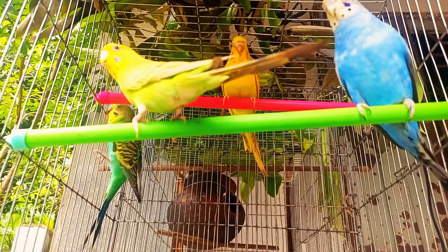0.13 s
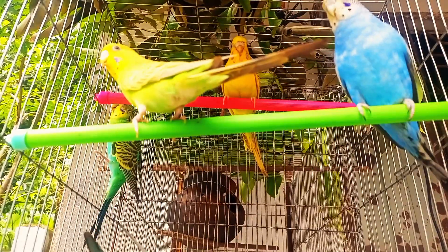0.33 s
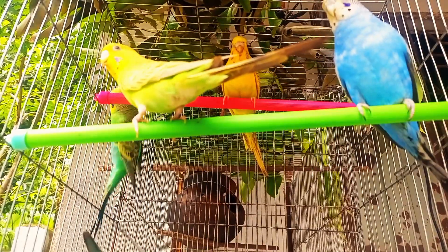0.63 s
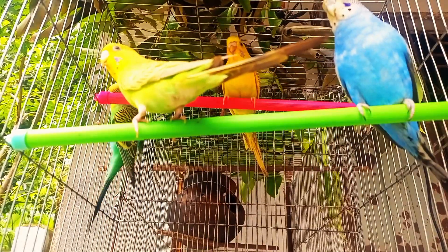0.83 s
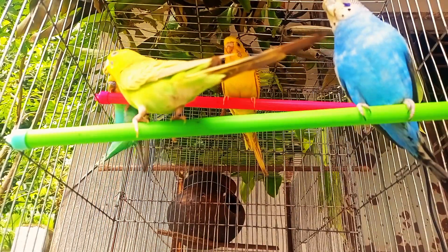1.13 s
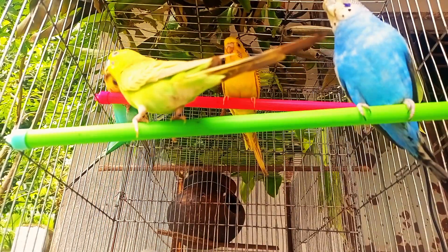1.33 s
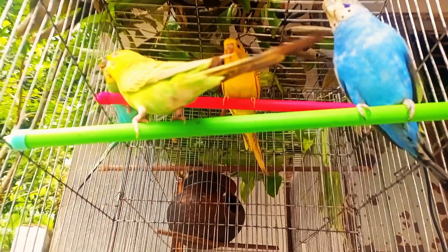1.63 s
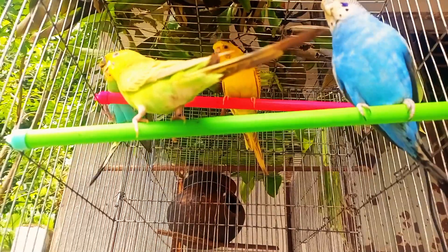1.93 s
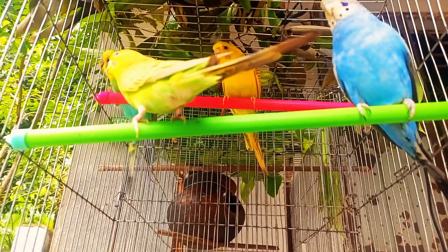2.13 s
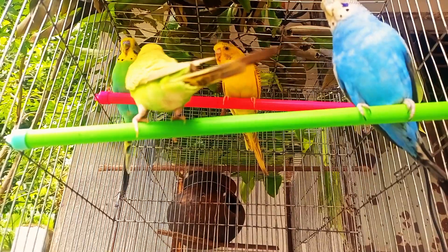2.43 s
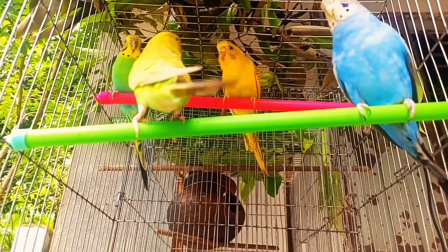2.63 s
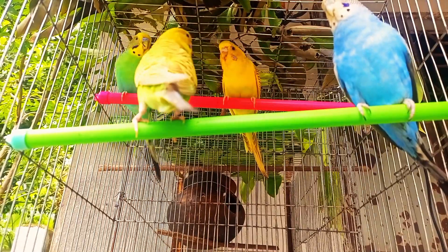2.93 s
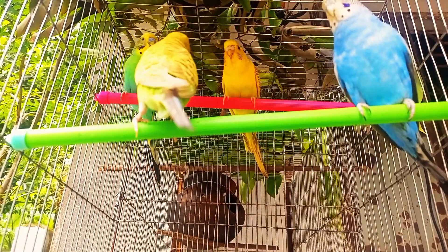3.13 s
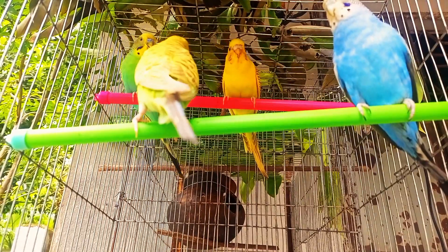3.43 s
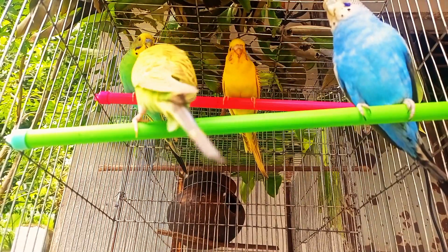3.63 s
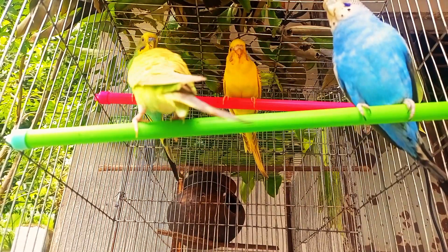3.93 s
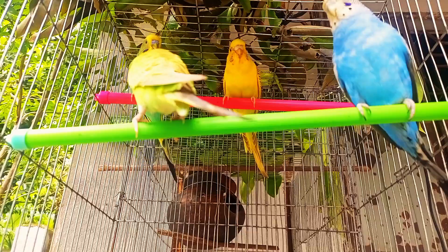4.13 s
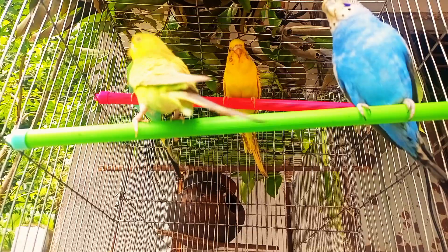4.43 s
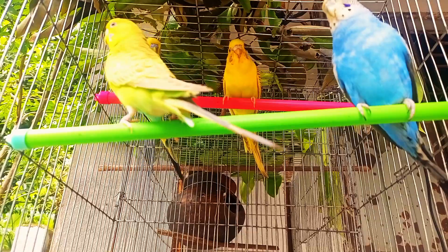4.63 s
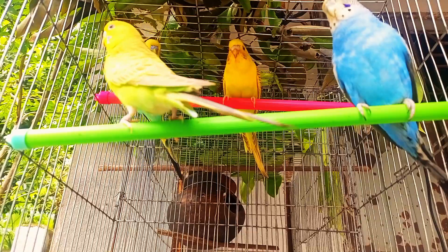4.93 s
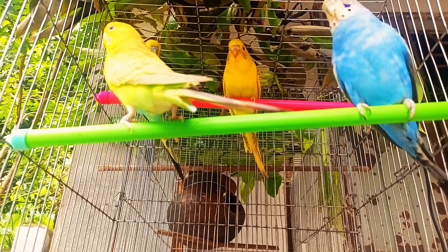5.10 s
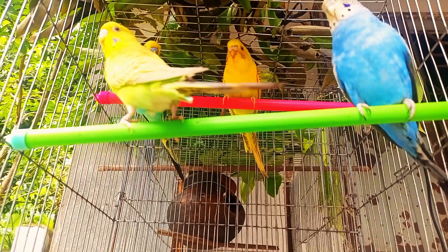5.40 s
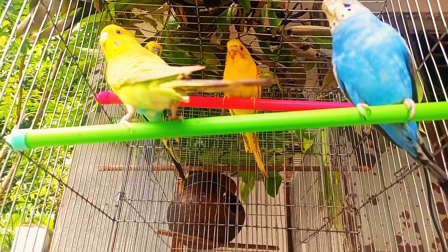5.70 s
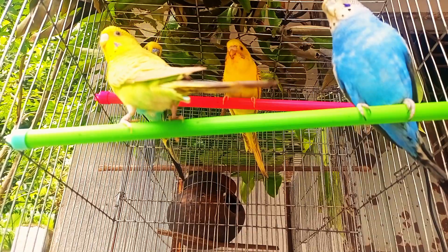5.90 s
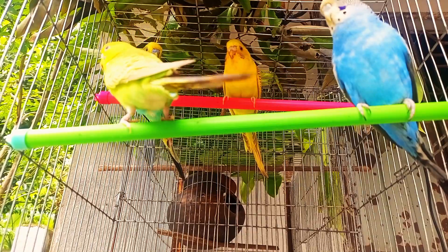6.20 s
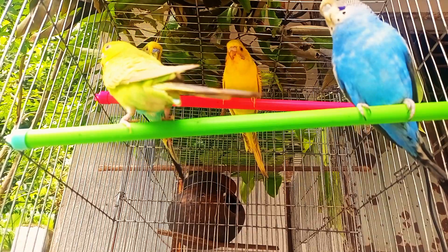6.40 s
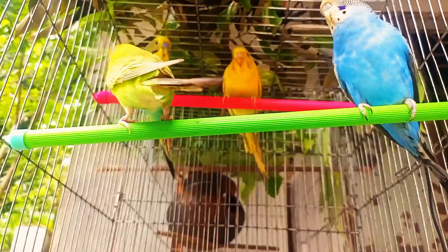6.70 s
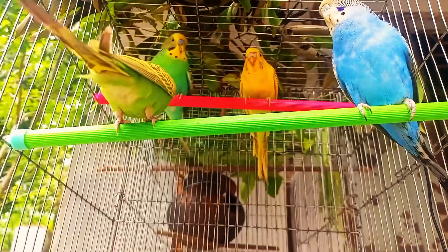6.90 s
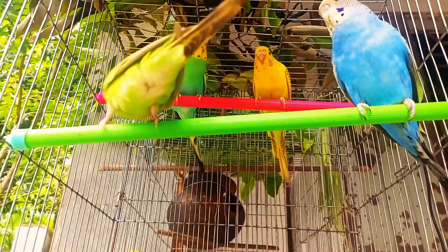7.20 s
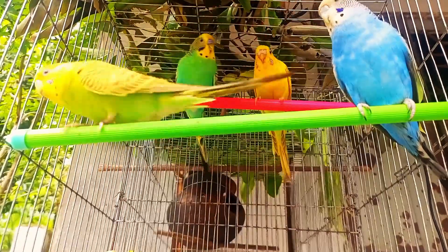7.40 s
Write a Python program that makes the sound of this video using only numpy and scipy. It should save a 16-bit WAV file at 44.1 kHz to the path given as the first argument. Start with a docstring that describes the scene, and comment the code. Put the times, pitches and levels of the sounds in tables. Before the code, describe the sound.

Close in a wire cage, a budgie gives a rapid, reedy warble, then the bars are struck in a metallic clatter and a louder chatter follows. After a quiet gap with one distant dove hoot, rolling coos, a brief warble, a climbing whistle in paired notes and regular chick peeps come from farther off. One last dry burst of chatter ends it. Quiet outdoor air, short yard echo.

```python
"""Budgerigars warble close to the microphone, in a wire cage in a yard: bursts of short bending near-sine notes.
Claws and wings knock and tick on the cage: noisy blows ring the bars, and shaped noise makes mesh and ticks.
Farther off a chick peeps and another bird whistles up a scale in gliding sines, mostly with an echo.
Doves coo in a chopped low tone and hoot once; filtered noise makes the insects, quiet air and gusts."""
import sys
import numpy as np
from scipy import signal
from scipy.fft import rfft, irfft, next_fast_len
from scipy.io import wavfile

SR = 44100
rng = np.random.default_rng(int(sys.argv[2]) if len(sys.argv) > 2 else 0)


def master(y):
    """Save y as 16-bit WAV."""
    cut = np.clip(np.atleast_2d(y).T, -1, 1)
    pcm = np.round(cut * 32767)  # scale
    wavfile.write(sys.argv[1], SR, pcm.astype(np.int16))


N = 332955
T = np.arange(N) / SR   # time [s]

# contacts on the cage: (time [s], ring, tick, thump and knock levels [dB], tick t60 [s])
CONTACTS = [(0.34, -59, -64, -94, -71, 0.2), (0.399, -58.5, -69, -87, -64.5, 0.35),
            (1.199, -45.5, -58, -67, -43, 0.17), (1.403, -30.5, -49, -39.5, -65, 0.27),
            (1.409, -38.5, -69, -42, -38, 0.24), (1.507, -47, -70, -56, -61.5, .25),
            (1.543, -40.5, -45.5, -66, -49.5, 0.2), (1.646, -45, -77, -69.5, -63, 0.064),
            (1.912, -69, -39.5, -86, -87.5, 0.09), (2.74, -57.5, -53.5, -82.5, -81.5, 0.067),
            (4.722, -69, -60, -69.5, -77, 0.18), (4.823, -66, -55.5, -87.5, -84, 0.21),
            (5.184, -75, -62.5, -67, -92.5, 0.13), (5.66, -61, -55, -93, -94, 0.026),
            (6.13, -70.5, -65, -76.5, -71, 0.15), (6.709, -67, -63, -84, -80.5, 0.087),
            (7.089, -62, -53, -65.5, -75, 0.061)]
CONTACT_S = 0.004   # t60 of the scuff that starts a contact; also the rise time of its crack


def amp(db):
    """dB to gain."""
    return 10 ** (np.asarray(db) / 20)


def rms_one(x):
    """Scale to unit rms."""
    return x / np.sqrt(np.mean(np.abs(x) ** 2) + 1e-20)


def noise():
    """White noise as long as the scene."""
    return rng.standard_normal(N)


def band_noise(low_hz, high_hz, order=2):
    """Noise between two frequencies, at unit rms."""
    band = signal.butter(order, [low_hz, high_hz], "band", fs=SR, output="sos")
    return rms_one(signal.sosfilt(band, noise()))


def coloured(x, points):
    """Shape a signal by a spectrum of (frequency [Hz], gain [dB]), joined on a log frequency axis."""
    size = next_fast_len(len(x))
    point_hz, point_db = np.transpose(points)
    log_hz = np.log(np.arange(size // 2 + 1) * SR / size + 1)
    gain = amp(np.interp(log_hz, np.log(point_hz), point_db))
    return irfft(rfft(x, size) * gain, size)[:len(x)]


def wander(hz, order=2):
    """Low-passed noise at unit rms; its first second is dropped so that the filter has settled."""
    low_pass = signal.butter(order, hz, fs=SR, output="sos")
    return rms_one(signal.sosfilt(low_pass, rng.standard_normal(N + SR))[SR:])


def ring(clicks, hz, t60):
    """A decaying resonance: a unit click sets a sine of height 1 ringing."""
    radius, turn = amp(-60 / (t60 * SR)), 2 * np.pi * hz / SR
    feedback = [1, -2 * radius * np.cos(turn), radius * radius]
    return signal.lfilter([0, np.sin(turn)], feedback, clicks + 1e-18)


def echoes(x, t60, fade_s, wall_hz):
    """Walls and foliage scatter sound into a dense dull tail of unit energy that thins out after fade_s."""
    s = np.arange(SR // 2) / SR
    rise = np.clip(s / (t60 / 40), 0, 1)
    tail = rng.standard_normal(len(s)) * amp(-60 * s / t60) * rise / (1 + (s / fade_s) ** 4)
    tail = signal.sosfilt(signal.butter(1, wall_hz, fs=SR, output="sos"), tail)
    return signal.fftconvolve(x, tail / np.sqrt(np.sum(tail ** 2)))[:N]


def glide(start, length, hz, db, edge_s):
    """Samples, phase and gain of a note whose pitch bends through evenly spaced points."""
    u = np.arange(int((length + edge_s) * SR)) / (length * SR)   # progress through the note
    at = round(start * SR) + np.arange(len(u))
    bend = np.polyfit(np.linspace(0, 1, len(hz)), hz, len(hz) - 1)
    pitch = np.polyval(bend, u)
    edge = np.minimum(u, u[-1] - u) * length / edge_s
    gain = amp(np.interp(u, [.1, .9], db)) * np.sin(np.pi / 2 * np.clip(edge, 0, 1))
    phase = 2 * np.pi * (np.cumsum(pitch) / SR + rng.random())
    keep = at < N
    return at[keep], phase[keep], gain[keep]


def envelope_db(s, length, attack, release):
    """Attack, hold and release, straight in dB; all but silent outside."""
    edge_db = -22.5   # where attacks start and releases end
    corners = [s, s + attack, s + length - release, s + length]
    return np.interp(T, corners, [edge_db, 0, 0, edge_db], -140, -140)


def budgies():
    """Near-sine notes; an unsteady syrinx chops them into throbs and smears them, and air rasps past the beak."""
    # warble notes: (time [s], length [s], pitch at start, middle and end [Hz], early and late level [dB],
    # roughness [0-1])
    warble = [(0.56, 0.013, 3900, 3640, 3350, -50, -41.5, 0.03),
              (0.574, 0.016, 3220, 3226, 3330, -32, -31, 0.033),
              (0.596, 0.018, 3270, 2968, 3130, -27.5, -31, 0.062),
              (0.609, 0.01, 4200, 3900, 3670, -39, -38.5, 0.056),
              (.62, 0.0051, 3100, 3140, 3320, -19, -24.5, 0.034),
              (0.631, 0.031, 1893, 2054, 2044, -32, -34.5, 0.2),
              (0.657, 0.025, 3410, 2904, 3060, -20, -23.5, 0.13),
              (0.681, 0.018, 3680, 4270, 3670, -28.5, -28.5, 0.067),
              (0.695, 0.021, 3010, 2870, 2940, -30.5, -33.5, 0.4),
              (0.793, 0.011, 3100, 2420, 2660, -26, -27.5, 0.035),
              (0.801, 0.013, 3870, 4160, 4440, -25, -35.5, 0.13),
              (0.817, 0.016, 3670, 3884, 4380, -23.5, -33, 0.11),
              (0.826, 0.067, 4154, 4060, 4310, -27.5, -28.5, 0.36),
              (.851, 0.019, 4090, 4370, 4250, -21, -28.5, 0.053),
              (0.875, 0.0059, 4240, 4170, 4220, -40, -18.5, 0.19),
              (0.878, 0.011, 1904, 1845, 1890, -24.5, -43, 0.21),
              (0.888, 0.0095, 3550, 2980, 2600, -19, -24.5, 0.11),
              (0.898, 0.019, 2670, 3078, 3225, -23.5, -20, 0.072),
              (0.917, 0.02, 3165, 2980, 2790, -22.5, -23, 0.19),
              (0.931, 0.023, 2920, 2790, 2580, -30, -45, 0.26),
              (0.935, 0.037, 3300, 2320, 2720, -23.5, -42.5, 0.35),
              (0.964, 0.01, 2780, 2420, 2500, -33, -33, 0.26),
              (.978, 0.035, 3686, 3667, 4160, -29, -32.5, 0.17),
              (.99, 0.0098, 3420, 3504, 3560, -21, -27.5, 0.024),
              (1.674, 0.018, 2830, 2430, 2237, -26.5, -17.5, 0.11),
              (1.692, 0.0063, 1350, 1355, 1523, -19.5, -14, 0.25),
              (1.705, 0.016, 3680, 3434, 3310, -17.5, -17, .04),
              (1.724, 0.009, 2750, 2715, 2770, -16, -10.5, 0.016),
              (1.738, 0.011, 2770, 2746, 2760, -13.5, -11.5, 0.011),
              (1.75, 0.009, 2600, 2636, 2390, -32.5, -15, 0.11),
              (1.758, 0.059, 2603, 2637, 2048, -28.5, -22.5, 0.23),
              (1.774, 0.024, 2580, 2553, 2463, -19, -17.5, 0.035),
              (1.791, 0.026, 2563, 2810, 2730, -28.5, -21, 0.35),
              (1.802, 0.018, 2202, 2191, 2108, -25.5, -17, 0.11),
              (1.819, 0.015, 3000, 3425, 3320, -15.5, -19.5, 0.15),
              (1.832, 0.0023, 3570, 2810, 3350, -6.5, -31, 0.079),
              (3.952, 0.012, 3250, 2920, 2629, -41, -42.5, 0.081),
              (3.977, 0.017, 5158, 3774, 3004, -52.5, -26.5, 0.05),
              (3.996, 0.013, 2790, 2330, 1910, -34.5, -40.5, 0.15),
              (4.026, 0.0098, 4800, 3900, 2800, -49.5, -37, 0.14),
              (4.034, 0.016, 2510, 2380, 2520, -36, -27, 0.08),
              (4.051, 0.019, 3310, 3716, 3620, -25, -31.5, 0.1),
              (4.056, 0.0072, 3710, 3230, 3040, -25, -28, .08),
              (4.063, 0.014, 1530, 2157, 2530, -28.5, -32.5, 0.25),
              (4.082, 0.024, 3670, 3650, 3680, -37, -42, .15),
              (4.084, 0.016, 2320, 2664, 2510, -20.5, -22, 0.05),
              (4.107, 0.014, 2900, 2590, 2730, -26, -31, 0.2),
              (4.106, 0.0084, 1402, 1356, 1235, -23, -18.5, 0.13),
              (4.218, 0.017, 4455, 3640, 3350, -27, -21.5, 0.021),
              (4.2342, 0.0031, 3260, 3203, 3100, -13.5, -19.5, .03),
              (4.241, 0.026, 2844, 2770, 2707, -26, -20.5, 0.12),
              (4.2741, 0.0039, 2430, 2260, 2150, -9.5, -31, 0.04),
              (4.28, 0.037, 2990, 3117, 2936, -19, -16, 0.0047),
              (7.156, 0.0043, 2750, 3150, 3600, -26, -43, 0.093),
              (7.159, 0.0073, 4240, 4160, 3900, -32, -47, 0.43),
              (7.168, 0.014, 3660, 4264, 3430, -44, -28, 0.038),
              (7.182, 0.0077, 3240, 2967, 2640, -12.5, -20.5, 0.018),
              (7.189, 0.02, 2645, 1870, 2590, -37.5, -33, 0.22),
              (7.207, 0.018, 4930, 4445, 3670, -55, -21, 0.077),
              (7.222, 0.0083, 4030, 3620, 3730, -27, -31, 0.19),
              (7.229, 0.0053, 1960, 1860, 2200, -20.5, -34, 0.096),
              (7.237, 0.015, 2470, 2740, 3480, -20.5, -23, 0.047),
              (7.255, 0.0052, 3600, 3280, 3080, -15, -18, 0.02),
              (7.263, 0.016, 2730, 2364, 2180, -30, -29, .27),
              (7.275, 0.016, 2100, 2292, 2535, -34, -25.5, 0.11),
              (7.299, 0.0054, 2870, 3410, 3320, -7, -45.5, 0.057),
              (7.304, 0.0085, 1370, 1268, 1194, -28, -31, 0.11)]
    # octave partial against the note, strongest on low notes: (middle pitch [Hz], level [dB])
    octave = [(1300, -3), (1900, -4), (2300, -17), (2800, -27.5), (3300, -23), (4300, -19.5)]
    # throat and beak colour: (frequency [Hz], gain [dB])
    beak = [(500, -22.5), (1100, -20), (1700, -0.5), (4500, 6), (6000, -4), (10000, -6), (16000, -8)]
    third_db, fourth_db = -32, -40   # further partials against the note, before any opening boost
    opening_db, pause_s, loud_db = 13, 0.07, -24   # boost of octave and third after a gap between note starts
    reedy_until_s, reedy_db = 1.1, -17   # the first singer is reedier: its octave never falls below this
    flutter_hz, wobble_hz, throb_hz = 870, 300, (90.14, 233)   # width of smear and pitch tremor, throb band
    rasp_db = -62   # breathy edge of the warble

    flutter = (wander(flutter_hz, order=4) + 1j * wander(flutter_hz, order=4)) / np.sqrt(2)
    throb = np.tanh(band_noise(*throb_hz, order=1))
    wobble = wander(wobble_hz, order=4)
    out, effort, last = np.zeros(N), np.zeros(N), 0
    for s, length, *hz, early_db, late_db, rough in warble:
        at, phase, gain = glide(s, length, hz, [early_db, late_db], edge_s=0.0028)
        phase = phase + 1.6 * rough * wobble[at]
        boost_db = opening_db if s - last > pause_s and late_db > loud_db else 0
        last = s
        octave_db = np.interp(hz[1], *np.transpose(octave)) + boost_db
        if s < reedy_until_s:
            octave_db = max(octave_db, reedy_db)

        upper = amp(octave_db) * np.exp(2j * phase)
        upper += amp(third_db + boost_db) * np.exp(3j * phase)
        if max(hz) < SR / 10:   # keeps the fourth partial from aliasing
            upper += amp(fourth_db) * np.exp(4j * phase)
        # the upper partials are the raspiest
        tone = np.exp(1j * phase) + upper * (1 + (.35 + 1.5 * rough) * flutter[at])
        depth = min(4 * rough, 1)
        membrane = (1 + depth * throb[at]) / (1 + depth / 2) + 1.4 * rough ** 2 * flutter[at]
        out[at] += gain * np.real(tone * membrane)
        effort[at] += gain * rough
    hiss = np.diff(rng.standard_normal(N + 2), 2)   # turbulence, strongest in the treble
    return coloured(out + amp(rasp_db) * effort * hiss, beak)


def bars():
    """Each contact is a noisy scuff that rings the bars anew and thumps the perch."""
    # modes of the bars: (frequency [Hz], level [dB], t60 [s])
    bar_modes = [(131.15, 0.5, 0.35), (216, 2.5, 0.19), (341.4, 4, 0.12), (660, -2.5, 0.25), (916, 2, 0.33),
                 (1040, -1, 0.081), (1770, -5.5, 0.22), (1955, -7.5, 0.25), (2040, -4.5, .17),
                 (2290, -11.5, 0.23), (2489, -10, 0.2), (3030, -8.5, 0.15), (3226, -0.5, 0.11),
                 (5350, -13.5, .15), (6500, -11.5, .09)]
    thump_lag_s = 0.008   # the perch answers late
    rattle_s, rattle_db = 0.16, -20   # t60 and level of the rattle after the scuff
    s, ring_db, _, thump_db, knock_db, _ = np.transpose(CONTACTS)
    at = np.round(s * SR).astype(int)
    strength_db = rng.normal(-3, 2.5, (len(at), len(bar_modes)))   # no two blows excite the modes alike
    t, out = T[:SR // 10], np.zeros(N)
    for k, (hz, level_db, t60) in enumerate(bar_modes):
        blow_db = thump_db if hz < 500 else knock_db if hz < 1300 else ring_db
        lag = round(thump_lag_s * SR) if hz < 500 else 0
        clicks = np.zeros(N)
        clicks[at + lag] = amp(blow_db + level_db + strength_db[:, k])
        decay = amp(-60 * t / CONTACT_S) + amp(rattle_db - 60 * t / rattle_s)
        scuff = rng.standard_normal(len(t)) * decay
        scuff /= abs(scuff @ np.exp(2j * np.pi * hz * t))   # unit strength at the mode
        out += ring(signal.oaconvolve(clicks, scuff)[:N], hz, t60)
    return out * amp(1.5 * wander(90.0))   # loose wires beat and damp the ring


def mesh():
    """Contacts crack drily and tick, and leave the many wires of the mesh shivering: bursts of shaped noise."""
    # shiver of the mesh, before it is made ragged: (frequency [Hz], relative level [dB])
    shiver_colour = [(70, -29), (123, -9), (339, -11.5), (800, -12), (1400, -23.5), (1900, -14),
                     (3250, -15.5), (3750, -27.5), (5300, -27), (7000, -36), (9100, -51), (15400, -120)]
    # colour of the ticks: (frequency [Hz], relative level [dB])
    tick_colour = [(3820, -31), (6500, -10.5), (8350, -21.5), (9240, -23), (10300, -9.5), (14800, -7),
                   (15900, -3.5)]
    crack_db, crack_s, crack_hz = -5, 0.05, (1300, 3800)   # level against the ring, t60, band
    wires, ragged_db = 240, 5
    shiver, tick, crack = np.zeros((3, N))
    for s, ring_db, tick_db, _, _, t60 in CONTACTS:
        i = round(s * SR)
        t = T[:N - i]
        shiver[i:] += amp(ring_db - 6 - 60 * t / (1.9 * t60)) * np.tanh(t / 0.011) ** 2
        crack[i:] += amp(ring_db + crack_db - 60 * t / crack_s) * np.tanh(t / CONTACT_S)
        tick[i:] += amp(tick_db - 60 * t / t60)
    hz, db = np.transpose(shiver_colour)
    wire_hz = np.geomspace(hz[0], hz[-1], wires)
    wire_db = np.interp(np.log(wire_hz), np.log(hz), db) + rng.normal(0, ragged_db, wires)   # loud and faint
    buzz = shiver * rms_one(coloured(noise(), np.c_[wire_hz, wire_db]))
    buzz += tick * rms_one(coloured(noise(), tick_colour))
    grain = amp(1.0 * wander(180.0) + 1.5 * wander(29.0))   # wires buzz against each other unevenly
    return crack * band_noise(*crack_hz) + grain * buzz


def struck(blows, modes):
    """Each blow is one short click into a few quick modes."""
    clicks = np.zeros(N)
    for s, db in blows:
        clicks[round(s * SR)] = amp(db)
    return sum(amp(db) * ring(clicks, hz, t60) for hz, db, t60 in modes)


def perch_taps():
    """Hard taps set a plastic perch ringing briefly."""
    # (time [s], level [dB])
    tap_blows = [(1.545, -33), (1.645, -36.5)]
    # modes of the perch: (frequency [Hz], level [dB], t60 [s])
    perch_modes = [(1004, -1, .07), (2480, -3, 0.055), (4650, -4.5, 0.029)]
    return struck(tap_blows, perch_modes)


def wire_plucks():
    """A beak plucks a single wire, which rings at two pitches."""
    # (time [s], level [dB])
    plucks = [(5.567, -60), (5.66, -49.5), (6.228, -66.5)]
    # modes of the wire: (frequency [Hz], level [dB], t60 [s])
    wire_modes = [(2010, 0.5, 0.11), (3289, -1, .09)]
    return struck(plucks, wire_modes)


def far_birds(notes, edge_s, unsteady_db):
    """Gliding sines, a little unsteady after the long way through moving air."""
    out = np.zeros(N)
    for s, length, hz, db in notes:
        at, phase, gain = glide(s, length, hz, db, edge_s)
        out[at] += gain * np.sin(phase)
    return out * amp(unsteady_db * wander(100))


def chick():
    """Peeps alike in length and falling pitch, coloured by what carries over the distance."""
    # (time [s], level before the distance colour [dB])
    peep_times = [(0.066, -71), (3.599, -79), (4.627, -58), (4.961, -58), (5.288, -60), (5.685, -64.5),
                  (5.999, -61), (6.328, -56.5), (6.655, -58.5), (7.028, -57.5), (7.339, -54)]
    # what carries of the peeps: (frequency [Hz], gain [dB])
    carried = [(1500, -20.5), (2200, -15.5), (2800, -4), (3400, 5.5), (4000, 5.5), (4900, -9)]
    pitch_hz = (4650, 3150, 2600, 2000)   # at four even steps
    notes = [(s, 0.12, pitch_hz, [db, db]) for s, db in peep_times]
    return coloured(far_birds(notes, edge_s=0.022, unsteady_db=4), carried)


def faint_birds():
    """Faint single notes of other birds, each a sine gliding straight from one pitch to another."""
    # (time [s], length [s], pitch at start and end [Hz], level [dB])
    tweets = [(.478, 0.016, 365, 358, -61), (0.646, 0.012, 1290, 960, -64.5),
              (2.46, 0.045, 4120, 3920, -77), (2.641, 0.029, 1933, 1740, -69),
              (2.96, 0.13, 3900, 3500, -81), (3.248, 0.081, 3796, 3930, -76.5),
              (4.329, 0.024, 288, 328, -67.5), (4.52, 0.17, 3264, 3620, -65),
              (5.461, 0.046, 3870, 4030, -62.5), (5.92, 0.11, 3395, 3544, -69.5),
              (6.584, .05, 1836, 1763, -81), (7.197, 0.013, 404, 383, -66.5), (7.279, 0.028, 513, 528, -67),
              (7.479, 0.057, 4590, 4320, -65.5)]
    notes = [(s, length, (a, (a + b) / 2, b), [db, db]) for s, length, a, b, db in tweets]
    return far_birds(notes, edge_s=0.009, unsteady_db=6)


def scale_whistles():
    """Sine whistles up a scale, in pairs after one lead-in note; each drops and fades at its end."""
    # first note of each pair: (time [s], pitch [Hz], level [dB])
    first_notes = [(4.496, 1180, -48.5), (4.749, 1278, -44), (4.986, 1330, -39.5), (5.237, 1397, -41.5),
                   (5.493, 1432, -44.5)]
    # single note ahead of the pairs: (time [s], pitch [Hz], level [dB])
    lead_note = (4.375, 1080, -64)
    repeat_s, repeat_db = 0.083, -1.5   # second note of a pair against the first
    settle_hz, settle = 1392, 0.448   # it settles this share of the way to a home pitch
    bend, fade_db = np.array([1, 0.94, 0.85]), -23.5   # pitch ratios and fade within a note
    scale = [lead_note, *first_notes]
    for s, hz, db in first_notes:
        scale.append((s + repeat_s, hz + settle * (settle_hz - hz), db + repeat_db))
    notes = [(s, 0.085, hz * bend, [db, db + fade_db]) for s, hz, db in scale]
    return far_birds(notes, edge_s=0.016, unsteady_db=0.5)


def dove_coos():
    """Rolling coos: a low tone chopped by an uneven roll."""
    # (time [s], length [s], centre pitch at start and end [Hz], level [dB],
    # mean throb rate at start and end [1/s], attack [s], release [s])
    coos = [(3.251, 0.11, 668, 667, -52, 97.5, 89.7, 0.053, 0.026),
            (3.42, 0.37, 621.5, 586, -48.5, 80.5, 79.6, 0.059, 0.29),
            (3.6, 0.56, 619.6, 608, -47, 80.4, 77.4, 0.058, 0.027),
            (4.101, 0.2, 673.5, 607, -49.5, 108.4, 79.7, 0.018, 0.1),
            (4.533, 0.222, 695, 700, -43, 101.7, 91.2, 0.11, 0.067),
            (4.72, 0.37, 709, 660, -47.5, 43.7, 45.5, 0.01, 0.049),
            (5.16, 0.07, 648, 598, -50.5, 30.15, 39.4, 0.028, 0.028)]
    out, uneven, waver = np.zeros(N), wander(18.0), wander(35.4)
    for s, length, hz, end_hz, db, throbs, end_throbs, attack, release in coos:
        span = [s, s + length]
        gain = amp(db + envelope_db(s, length, attack, release) + 0.34 * waver)
        rate = np.interp(T, span, [throbs, end_throbs]) * (1 + .25 * uneven)
        pitch = np.interp(T, span, [hz, end_hz]) * (1 + .025 * waver)
        roll = np.cos(np.pi * np.cumsum(rate) / SR) + 0.23   # half a turn per throb
        out += 2 * gain * roll * np.sin(2 * np.pi * np.cumsum(pitch) / SR)
    return out


def dove_hoot():
    """A clear hoot: a steady tone that swells to its middle, with an octave that stops early."""
    start_s, length_s, octave_s = 2.445, 0.4, 0.285
    attack_s, release_s = 0.055, 0.03
    pitch_hz, peak_db, swell_db, octave_level_db = 658, -48.5, 21, -56.5   # levels are rms
    swell = np.sin(np.pi * np.clip((T - start_s) / length_s, 0, 1)) - 1
    db = peak_db + swell_db * swell + envelope_db(start_s, length_s, attack_s, release_s)
    octave_db = octave_level_db + envelope_db(start_s, octave_s, attack_s, release_s)
    phase = 2 * np.pi * pitch_hz * T
    return np.sqrt(2) * (amp(db) * np.sin(phase) + amp(octave_db) * np.sin(2 * phase))


def insects():
    """Narrow bands of hiss, each swelling and fluttering on its own."""
    # (centre [Hz], width [Hz], middle level [dB])
    insect_bands = [(5450, 560, -81.5), (5760, 230, -82)]
    out = np.zeros(N)
    for hz, width, db in insect_bands:
        swell_db = 2.5 * wander(3) + 2 * wander(20)
        out += amp(db + swell_db) * band_noise(hz - width / 2, hz + width / 2)
    return out


def gusts():
    """Moving air on the microphone: lumpy low noise that swells when wings stir the air."""
    # middle level over time: (time [s], level [dB])
    gust_levels = [(0, -71), (.95, -73.5), (2.1, -73), (3.379, -75), (3.53, -53), (3.621, -70),
                   (3.742, -74.5), (6.6, -80.5), (6.848, -65), (7.55, -88)]
    s, db = np.transpose(gust_levels)
    puff = coloured(noise(), [(30, -18.5), (80, 2), (250, -4.0), (600, -8.0), (2000, -30.5), (4000, -49.0)])
    return amp(np.interp(T, s, db) + 1.5 * wander(9.3)) * rms_one(puff)


def quiet_air():
    """Distant rumble and hiss: shaped noise that drifts slowly in level."""
    # (frequency [Hz], relative level [dB])
    air_colour = [(15, -32.5), (25, 1.5), (87, 3.5), (223, -5), (450, -9.5), (558, -8), (1560, -15),
                  (3800, -13.5), (4720, -20.5), (5700, -19), (6350, -26), (7880, -35.5), (13500, -38),
                  (14700, -31), (15900, -31)]
    return amp(-70.5 + 1.5 * wander(1.9)) * rms_one(coloured(noise(), air_colour))


def scene():
    """Near sounds get a short yard tail; the chick and faint birds arrive mostly as echo."""
    warble = budgies()
    blur_db = 2.2 * wander(70)   # fast random level wander keeps the echo tails from ringing at fixed pitches
    yard = amp(-17.0 + blur_db) * echoes(warble, t60=0.41, fade_s=0.19, wall_hz=5000)
    yard += amp(-9) * echoes(warble, t60=.06, fade_s=.05, wall_hz=7000)   # close surfaces answer at once
    cage = bars() + mesh() + perch_taps() + wire_plucks()

    peeps = chick() + faint_birds()
    far = amp(-3) * peeps
    far += amp(1.5 + blur_db) * echoes(peeps, t60=0.34, fade_s=0.32, wall_hz=6140)
    far += amp(-23.5) * np.roll(far, round(0.12 * SR))   # a late return from a far wall
    whistle = scale_whistles()
    far += whistle + amp(-3.0) * echoes(whistle, t60=0.32, fade_s=0.32, wall_hz=5950)
    doves = dove_coos() + dove_hoot()
    far += doves + amp(-11) * echoes(doves, t60=.3, fade_s=.08, wall_hz=6000)
    return (warble + yard + cage + far + insects() + gusts() + quiet_air())[None]


def record(dry):
    """The microphone loses the deep bass and rounds the peaks; the top is cut steeply."""
    bass_cut = signal.butter(2, 45, "high", fs=SR, output="sos")
    rounded = .6 * np.tanh(signal.sosfilt(bass_cut, dry) / .6)
    top_cut = signal.cheby2(14, 70, 16300, fs=SR, output="sos")   # 70 dB down from 16300 Hz
    return signal.sosfilt(top_cut, rounded)


dry = scene()
out = record(dry)
master(out)
```